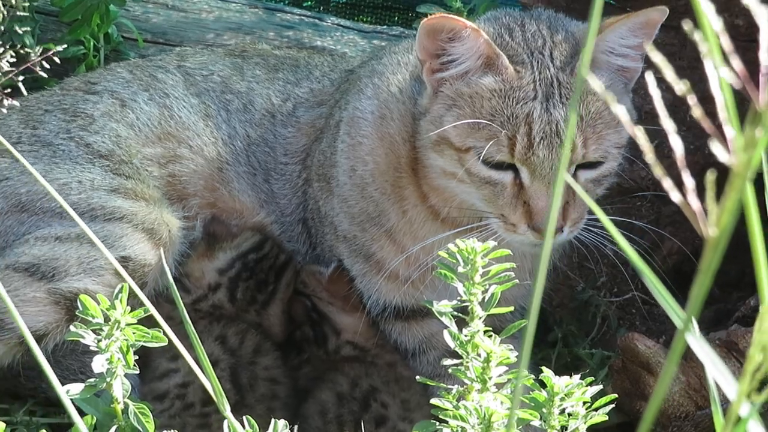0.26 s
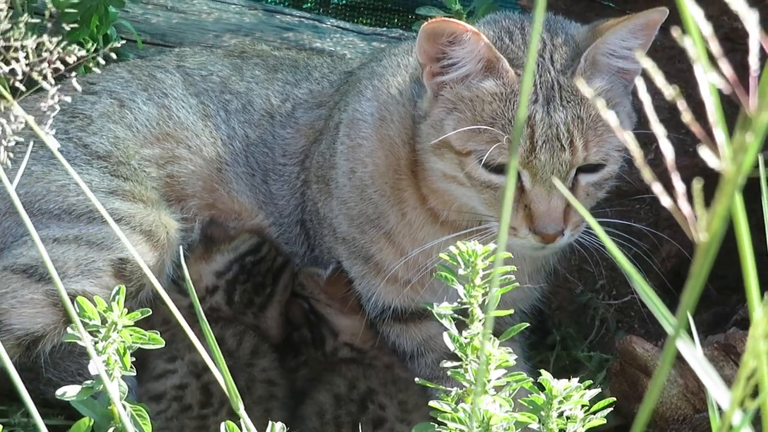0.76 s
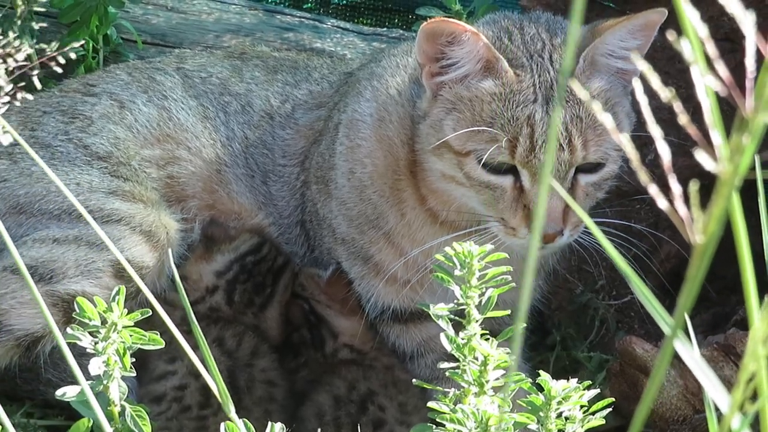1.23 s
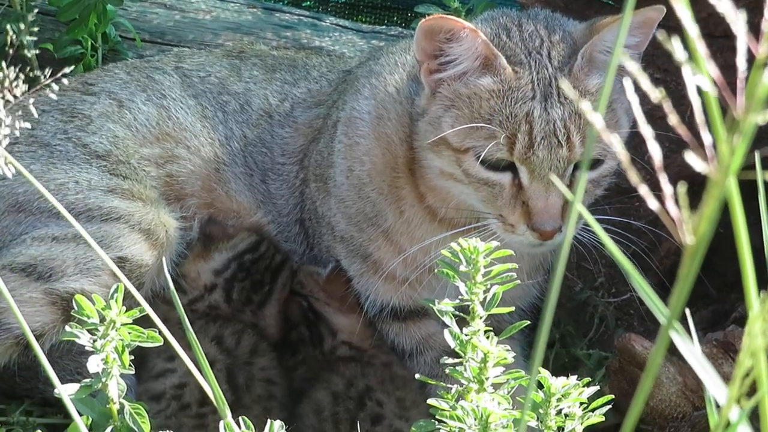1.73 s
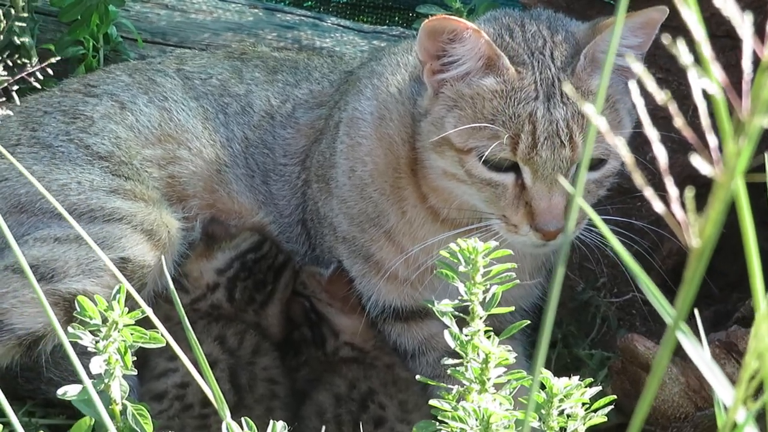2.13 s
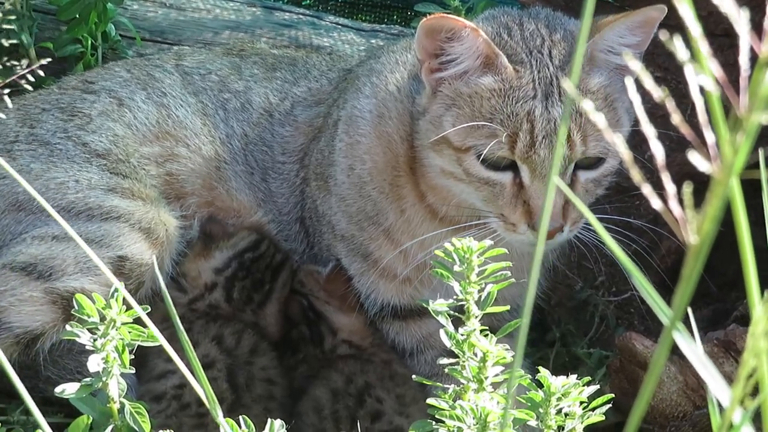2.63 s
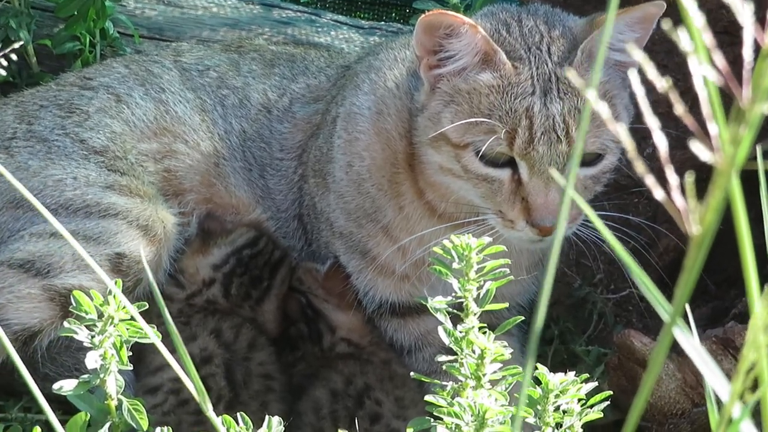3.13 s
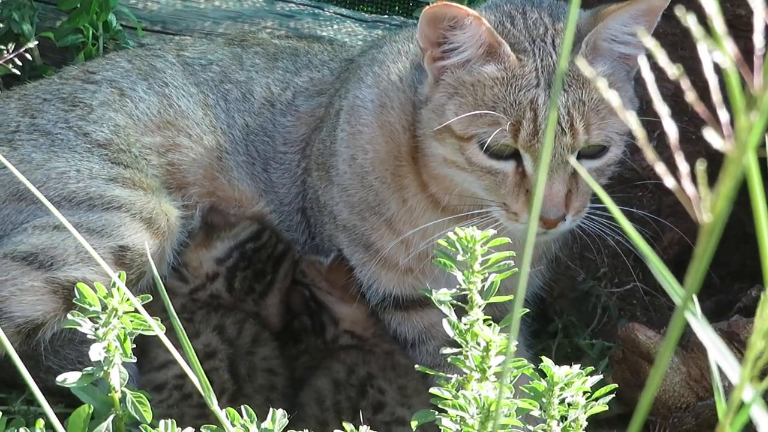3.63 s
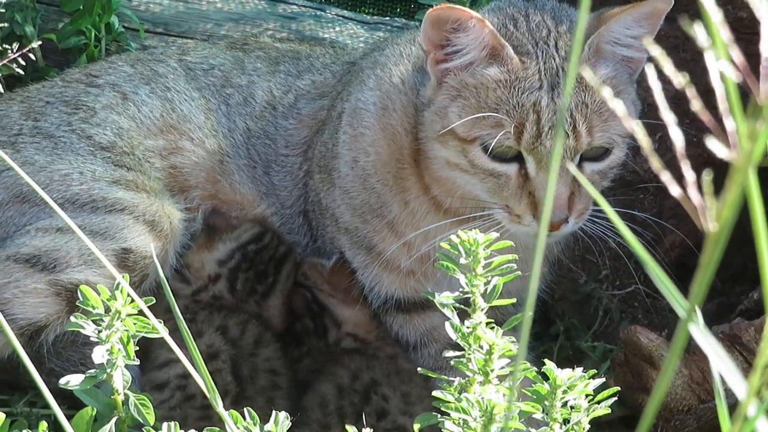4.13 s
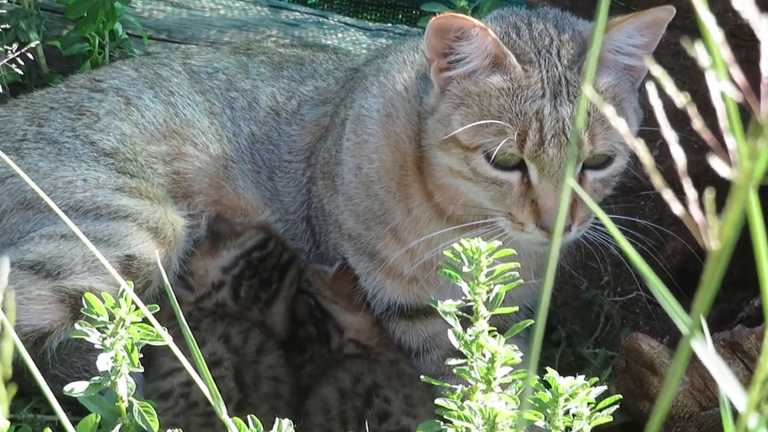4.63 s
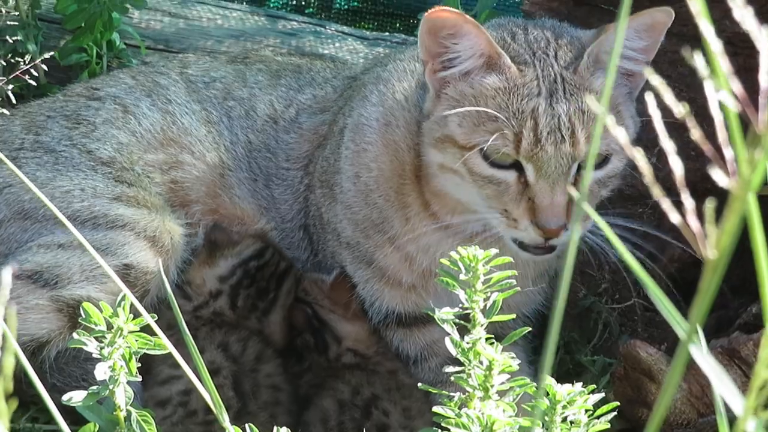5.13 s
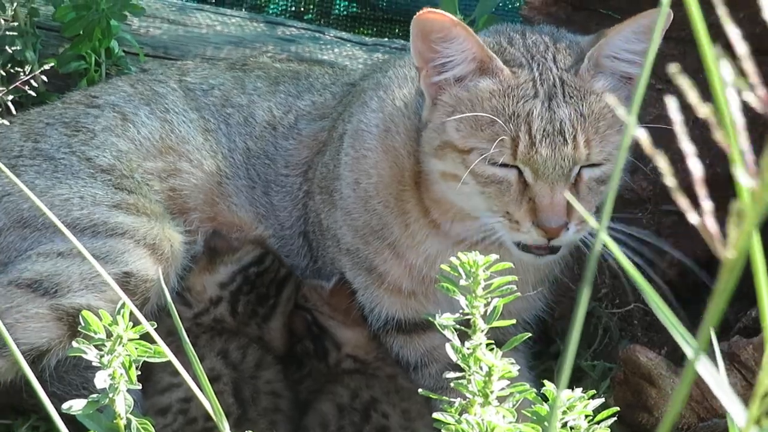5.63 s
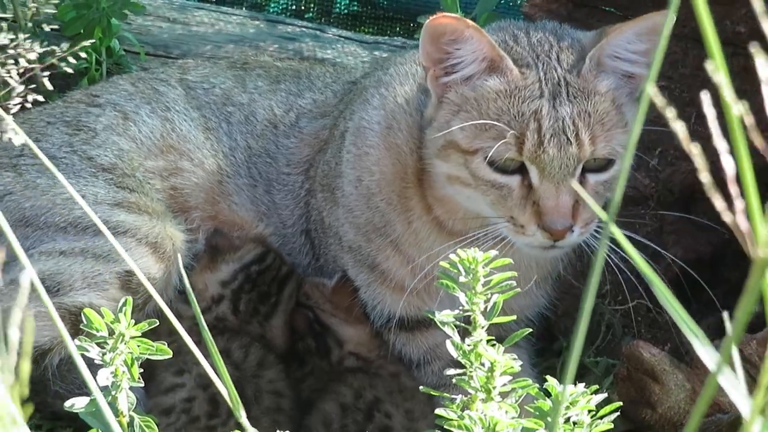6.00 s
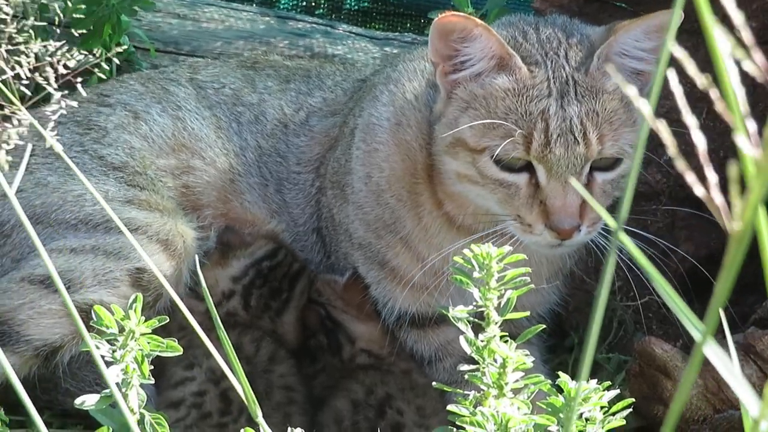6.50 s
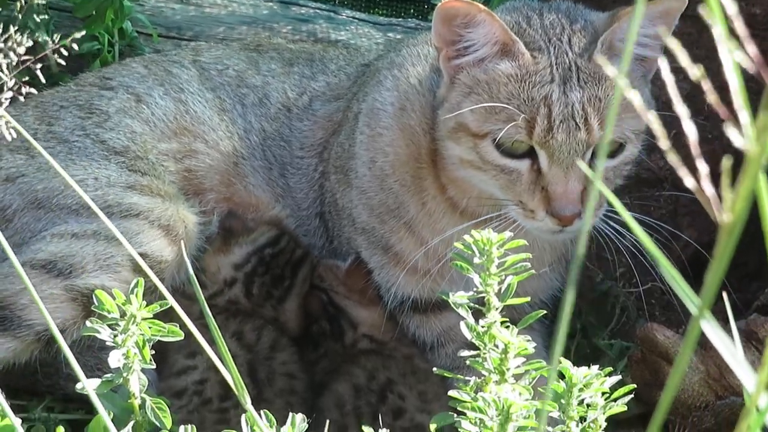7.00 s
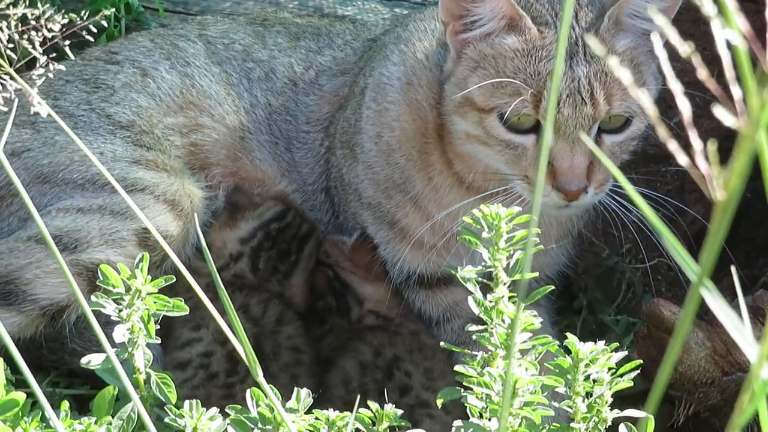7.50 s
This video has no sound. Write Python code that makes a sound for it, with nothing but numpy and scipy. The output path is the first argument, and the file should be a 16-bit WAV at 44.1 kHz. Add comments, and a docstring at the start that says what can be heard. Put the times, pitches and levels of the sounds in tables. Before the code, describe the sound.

A quiet grassy outdoor place with thin hiss, a faint drone and a distant wavering low hum throughout. From 0 to 1.2 s, wind bumps the microphone in soft, low, uneven thuds. A small bird gives faint high peeps about every 0.3 s until 3 s; quick chirrups come near 0.7, 2.1 and 4 s, with sliding whistled phrases at 1.3 and 3.1 s. Light wind puffs recur around 2 and 2.7-3.1 s, then it calms. At 5.2, 5.6 and 5.9-6.2 s a nearby cat makes tiny hoarse, breathy, clipped mews with small lip clicks. Thin stray chirps follow around 6.2-6.4 s, and wind bumps return until 6.9 s. At about 7.3-7.6 s a sudden squall slams both sides of the stereo microphone differently: a loud, rough, low thump with fluttering rattle, much louder than everything else, quickly subsiding to hum and a faint last whistle.

```python
"""Tall grass outdoors, two microphone ports; a machine hum, a drone and a hiss run throughout.
0 s: gusts (shaped noise) and eddies (swept-in harmonic swings) buffet the ports; a bird peeps to 3 s.
0.6-4.1 s: chirrups and whistled phrases, sines on pitch glides, among stray notes that run to the end.
5.2-6.2 s: hoarse cat calls: noise through two mouth resonances, voiced partials, ringing lip clicks.
6.2-7.7 s: more eddies, then a squall that roughens the wind, rattles one port and sets the two apart."""
import sys
import numpy as np
from scipy import signal
from scipy.fft import rfft, irfft, next_fast_len
from scipy.io import wavfile
from scipy.ndimage import uniform_filter1d

SR = 44100
rng = np.random.default_rng(int(sys.argv[2]) if len(sys.argv) > 2 else 0)


def transcribe(signal):
    """Save signal, clipped to [-1, 1], as a 16-bit WAV file at the path in sys.argv[1]."""
    frames = np.atleast_2d(signal).T
    limited = np.clip(frames, -1, 1)
    pcm = np.round(limited * 32767).astype(np.int16)
    wavfile.write(sys.argv[1], SR, pcm)


N = 341951
TIME_S = np.arange(N) / SR

# wind at the ports outside the squall, before flutter: t/s, level/dB
GUST = [(0, -58), (.22, -42.5), (.6, -36.5), (.78, -53.5), (1.1, -34), (1.26, -53.5), (1.7, -55),
        (1.88, -48.5), (2.55, -54), (2.9, -41), (3.1, -48.5), (3.45, -56), (3.81, -43), (4.41, -59.5),
        (5.13, -48), (5.92, -59.5), (6.42, -45), (6.64, -35.5), (6.76, -53.5), (7.12, -44.5), (7.75, -59)]
# single eddies: t/s, level/dB, width at half height/ms
BUFFETS = [(0.185, -27, 12), (0.237, -31, 15), (.268, -30.5, 19), (.349, -35, 23), (.402, -34, 15),
           (.439, -33.5, 19), (.539, -26.5, 13), (.638, -28, 7), (0.669, -22.5, 13), (.707, -30, 36),
           (.783, -30, 15), (1.057, -41, 26), (1.13, -31, 6.5), (1.157, -21.5, 11.5), (1.984, -30.5, 10),
           (2.698, -32, 20), (2.758, -26, 27), (2.793, -27.5, 9.5), (3.086, -27.5, 25), (6.239, -37, 21),
           (6.565, -30, 14), (6.655, -23.5, 24), (6.683, -30.5, 16), (6.736, -32, 14), (6.813, -21, 23),
           (6.849, -31.5, 27), (7.172, -31, 19), (7.318, -25.5, 26), (7.34, -25, 11), (7.363, -21, 6.9),
           (7.385, -14, 3), (7.399, -8, 18.7), (7.414, -13, 11), (7.433, -14.5, 4.9), (7.444, -11.5, 6.4),
           (7.468, -24, 9), (7.483, -16.5, 6.2), (7.496, -17, 4.4), (7.53, -12, 3.1), (7.542, -22.5, 14),
           (7.586, -18, 2.8), (7.603, -28, 8.2), (7.62, -33, 9.1), (7.649, -36, 16)]
# wind spectra, relative: f/Hz, level/dB
FLUTTER = [(10, -7), (30, 1.0), (55, 4.5), (85, -11.5), (130, -12.5), (250, -59.0)]
ROUGH = [(60, -25), (130, 19.5), (250, 0), (430, -17), (560, -62)]
# hoarse cat calls: t/s, length/ms, level/dB, low resonance f/Hz, its width/Hz,
# high resonance start f/Hz, end f/Hz, its level/dB, breath level/dB, attack/ms, change to the end/dB
RASPS = [(5.246, 54, -45.5, 2230, 240, 3800, 3140, -7, -4, 22, -5),
         (5.641, 78, -49, 2170, 300, 3550, 3920, -7, -3, 1.2, -9),
         (5.899, 78, -57.5, 2200, 300, 3700, 3520, -1, -5, 4.6, -7),
         (6.045, 140, -55.5, 1390, 400, 3060, 3110, -1, -2, 8, -3)]
# voiced mews: t/s, length/ms, pitch start, middle, end f/Hz, level/dB (2 dB is added),
# upper partials level/dB, attack/ms, lower partials change to the end/dB, partials under 2 kHz level/dB
MEWS = [(5.266, 56, 546, 555, 475, -51, -1, 8, -15, 2), (5.642, 47, 432, 446, 408, -45.5, -24, 1, -7, -11),
        (5.91, 45, 547, 485, 446, -55.5, -8, 6, -1, -1)]
# mouth response to the mews: f/Hz, level/dB
MOUTH = [(400, -9), (1100, -4), (1600, -14), (1900, -3), (2250, 0), (2800, -3), (3400, -2), (3900, -22)]
# parting lips: t/s, level/dB
SMACKS = [(5.257, -40), (5.702, -41), (5.9504, -39), (5.9613, -32)]
# ringing of a smack: f/Hz, decay time constant/ms, relative level/dB
LIPS = [(1300, 3.7, -8.5), (2250, 1.2, -3), (3000, 0.93, -2), (3700, 1.1, -5.5)]
# steady peep of one bird: end t/s, length/ms, level/dB
PEEPS = [(.035, 35, -63), (.278, 60, -57), (0.581, 48, -58.5), (.881, 36, -55.5), (1.19, 48, -54.5),
         (1.486, 31, -59), (1.795, 42, -63), (2.407, 50, -61), (2.704, 27, -52), (3.006, 30, -60)]
# stray whistled notes, mostly of other birds; the low one at 6.103 s is probably the cat's:
# t/s, length/ms, start, middle, end f/Hz, level/dB, left minus right/dB
NOTES = [(.09, 35, 3150, 3060, 2950, -66, 0), (.99, 55, 2650, 3010, 2850, -64, -1),
         (2.09, 42, 2600, 3000, 2640, -62, -2), (2.145, 40, 4350, 4600, 4850, -70, 0),
         (2.162, 12, 3050, 3200, 3350, -64, 0), (2.224, 12, 2450, 2900, 3500, -60, 0),
         (2.226, 30, 4450, 4250, 3900, -67, 0), (2.243, 14, 4700, 4200, 3700, -60, 0),
         (2.625, 25, 3850, 3920, 3950, -64, 0), (2.705, 62, 3990, 3890, 3740, -65, 2),
         (2.85, 130, 3720, 3700, 3520, -69, 0), (3.052, 32, 2800, 2990, 2950, -61, 0),
         (3.07, 22, 2436, 2690, 2900, -56.5, 0), (3.098, 20, 4200, 4270, 4200, -65, 0),
         (4.695, 100, 2900, 2790, 2580, -67, -1), (4.93, 21, 3450, 3100, 2800, -63, 0),
         (4.972, 58, 2730, 3520, 3980, -65, -2), (5.74, 170, 2940, 2550, 2380, -61, -1.5),
         (5.342, 30, 2900, 2970, 2720, -63, 0), (6.103, 68, 1840, 1800, 1740, -55, 1),
         (6.205, 41, 2680, 2960, 2440, -55, 0), (6.274, 45, 2860, 3800, 4300, -57.5, 0),
         (6.322, 20, 4300, 3400, 2450, -58, 0), (6.344, 14, 2750, 3600, 3980, -59, 0),
         (6.357, 22, 3980, 3670, 3100, -59.5, 0), (6.362, 22, 4300, 3750, 3250, -67, 0),
         (6.983, 156, 2980, 2906, 2610, -61, -1), (7.7, 60, 3050, 2940, 2750, -63.5, -1)]
# a phrase (rise, flick, down-sweep, its echo): t after phrase start/s, length/ms,
# start, middle, end f/Hz, relative level/dB, left minus right/dB
PHRASE = [(.005, 36, 2420, 2880, 3230, -7, -2), (.056, 16, 3050, 3340, 3550, -5, 0),
          (.097, 46, 5100, 4050, 2900, 1.5, -1), (.103, 46, 5040, 4000, 2860, -7, -1)]
# phrases: t/s, level/dB, sweep and echo raised by f/Hz, delayed by/ms
PHRASES = [(1.323, -52.5, 4, -1.5), (3.066, -55.5, -600, 12)]
# one chirrup (falls, whips up, breaks off, falls): t/ms, f/Hz, relative level/dB
CHIRRUP = [(0, 4250, -10), (4, 4080, -0.5), (11.8, 3830, -0.5), (15.8, 3500, -7), (21.6, 3100, 2),
           (24.1, 4400, 9.5), (27, 5900, -16), (28.46, 4420, -30), (29.7, 4050, 3), (35.3, 3650, 6.5),
           (40.2, 3300, -5), (43, 3600, -9), (46.8, 3100, -15)]
# chirrups: t/s, level/dB, first note raised by f/Hz, extra level of the whip/dB
CHIRRUPS = [(.635, -51.5, 2, -5), (.73, -49, 341, -3), (2.054, -54, -4, -11), (2.183, -54.5, 100, -10),
            (3.988, -57, -6, -8), (4.094, -57, 328, -3)]
# far machine, before wavering: t/s, first partial level/dB, second partial level/dB
HUM = [(0, -43, -58.5), (.4, -48.5, -62), (.8, -53, -65), (1.08, -57, -66), (1.2, -46.5, -56.5),
       (1.55, -46.5, -59.5), (1.85, -46, -55), (2.15, -47.5, -57.5), (2.45, -57.5, -62.5), (2.9, -62, -63),
       (3.1, -45, -56.5), (3.65, -49.5, -60), (4.0, -53.5, -67), (4.35, -55, -68), (4.65, -62, -61.5),
       (5.0, -54, -65.5), (5.6, -57, -62), (5.85, -47, -71), (6.2, -46.5, -69), (6.45, -56, -73),
       (6.75, -53, -65), (7.75, -49.5, -65)]
# noisy drone: f/Hz, width of each filter pass/Hz, level/dB
DRONE = [(997.4, 72, -59), (818.5, 120, -64.5)]
# shared hiss spectrum, relative: f/Hz, density/dB
AIR_MID = [(18, -28), (30, -12), (97, -5), (111, -8.5), (126, -11), (182, -15.5), (243, -17), (284, -18.5),
           (531, -19.5), (590, -23.5), (969, -22.5), (1100, -23.5), (6200, -36.5), (15500, -51.5)]
# unshared hiss spectrum, relative: f/Hz, density/dB
AIR_SIDE = [(18, -37), (30, -34), (114, -28), (152, -5), (332, -1), (491, -3), (575, -8), (829, -8.5),
            (920, -10.5), (1720, -12.5), (5880, -23.5), (15500, -40)]

SQUALL_S, SQUALL_RISE_S, SQUALL_HOLD_S, SQUALL_FALL_S, SQUALL_DB = 7.25, .098, .22, .16, -30
SQUALL_PAN_DB, RATTLE_DB = -1.5, -29  # pan: left minus right, on top of the standing port balance
ROUGH_DB, SQUALL_ROUGH_DB = -23, -5.5  # roughness re flutter, in a breeze and in the squall
OUT_OF_STEP_S, OUT_OF_STEP_RISE_S, OUT_OF_STEP_HOLD_S, OUT_OF_STEP_FALL_S = 7.29, .1, .11, .03
OUT_OF_STEP_DB = -26
SWING_HZ, SWING_SLOPE = 77.3, .18  # pitch of a 10 ms eddy outside the squall; narrower swings faster
SQUALL_QUICKENS, SQUALL_SLOPE = .19, .28  # squall: fractional rise in pitch, amount added to the slope
PORT_TURN_HZ = 197  # turn of the right port's all-pass lag
PORT_RING_HZ, PORT_RING_WIDTH_HZ, PORT_RING_DB = 118, 120, 2.2
BREATH_HZ = (1800, 4050)  # band edges
PEEP_HZ, PEEP_PAN_DB = (4015, 4050, 3915), 1  # start, middle, end; left minus right
PEEP_SWELL_DB = 8  # a peep starts this much softer
HUM_HZ, HUM_THIRD_DB = 94.8, -8  # third partial re second
AIR_MID_DB, AIR_SIDE_DB = -49, -53.5
TOP_HZ = 15450


def undb(db):
    """Decibels to amplitude ratio."""
    return 10 ** (np.asarray(db) / 20)


def level(x, db):
    """Scale to an RMS level."""
    return x * undb(db) / np.sqrt(np.mean(x ** 2))


def band(x, hz, width_hz):
    """Resonance with gain 1 at the centre."""
    return signal.lfilter(*signal.iirpeak(hz, hz / width_hz, SR), x)


def band_twice(x, hz, width_hz):
    """Two equal resonances in series: steeper skirts."""
    return band(band(x, hz, width_hz), hz, width_hz)


def noise_band(hz, width_hz):
    """Narrow noise at RMS 1."""
    return level(band_twice(rng.standard_normal(N), hz, width_hz), 0)


def low_pass(x, order, hz):
    """Butterworth low-pass."""
    return signal.sosfilt(signal.butter(order, hz, fs=SR, output="sos"), x)


def coloured(spectrum):
    """Noise shaped by spectrum points, log-frequency interpolated."""
    size = next_fast_len(N)
    hz, db = np.transpose(spectrum)
    bins_hz = np.arange(size // 2 + 1) * SR / size
    gain = undb(np.interp(np.log(bins_hz + 1), np.log(hz), db))
    return irfft(rfft(rng.standard_normal(size)) * gain, size)[:N]


def walk(rate_hz):
    """Random levels held 1 / rate_hz and slewed twice; spread near 1."""
    k = int(SR / rate_hz)
    held = np.repeat(rng.standard_normal(N // k + 1), k)
    return 1.274 * uniform_filter1d(uniform_filter1d(held, k), k)[:N]


def swell(start_s, rise_s, hold_s, fall_s):
    """0 to 1 and back: attack, hold, release."""
    return np.interp(TIME_S, start_s + np.cumsum([0, rise_s, hold_s, fall_s]), [0, 1, 1, 0])


def curves(table):
    """Interpolate each column over time."""
    t_s, *columns = np.transpose(table)
    return [np.interp(TIME_S, t_s, c) for c in columns]


def progress(ms):
    """Ramp 0 to 1 over a length."""
    return np.linspace(0, 1, int(ms * SR / 1000))


def bend(u, start_hz, middle_hz, end_hz):
    """Parabolic pitch glide through three points."""
    return np.polyval(np.polyfit([0, .5, 1], [start_hz, middle_hz, end_hz], 2), u)


def phase(hz):
    """Integrate frequency to radians."""
    return 2 * np.pi * np.cumsum(hz) / SR


def add(out, t_s, sound):
    """Mix a sound in at a time."""
    i = max(int(t_s * SR), 0)
    out[..., i:i + sound.shape[-1]] += sound[..., :N - i]


def gusts(squall):
    """Turbulence: low flutter, with rougher noise that grows in the squall."""
    breeze_db = curves(GUST)[0]
    gust_db = breeze_db + squall * (SQUALL_DB - breeze_db)
    rough_db = ROUGH_DB + squall * (SQUALL_ROUGH_DB - ROUGH_DB)
    flutter, rough = level(coloured(FLUTTER), 0), level(coloured(ROUGH), 0)
    return undb(gust_db + 3.0 * walk(25)) * (flutter + undb(rough_db + 4.3 * walk(40)) * rough)


def add_eddies(near, squall):
    """Eddies: Gaussian-windowed swings, nearer a sawtooth when strong."""
    t = np.arange(-2000, 2000) / SR
    order = np.arange(1, 7)[:, None]
    for (t_s, db, ms), turn in zip(BUFFETS, rng.standard_normal(len(BUFFETS))):
        wild = squall[int(t_s * SR)]
        slope = SWING_SLOPE + SQUALL_SLOPE * wild
        hz = SWING_HZ * (1 + SQUALL_QUICKENS * wild) * (10 / ms) ** slope
        bump = np.exp(-np.log(2) * (2000 * t / ms) ** 2)
        # stronger eddy: slower suck, sharper snap back
        steep = np.clip((db + 38) / 36, 0, .75)
        cycles = hz * t + .29 * (1 - steep) * turn
        swing = steep ** (order - 1) / order * np.sin(order * 2 * np.pi * cycles)
        # 2 ms early to offset the port filter's delay
        add(near, t_s + t[0] - .002, undb(db) * bump * swing.sum(axis=0))


def ports(near, squall):
    """Right port: all-pass lag, ring and rattle; deepest swings are common to both."""
    near = low_pass(near, 8, 470)
    g = np.tan(np.pi * PORT_TURN_HZ / SR)
    late = signal.lfilter([g - 1, g + 1], [g + 1, g - 1], near)
    deep = low_pass(near - late, 1, 60)
    ring = (undb(PORT_RING_DB) - 1) * band(late, PORT_RING_HZ, PORT_RING_WIDTH_HZ)
    apart = swell(OUT_OF_STEP_S, OUT_OF_STEP_RISE_S, OUT_OF_STEP_HOLD_S, OUT_OF_STEP_FALL_S)
    opposed = undb(OUT_OF_STEP_DB - 61 * (1 - apart)) * noise_band(113, 80)
    rattle = undb(RATTLE_DB - 40 * (1 - squall) + 5.2 * walk(40)) * noise_band(201, 76)
    pan_db = SQUALL_PAN_DB / 2 * squall
    left = undb(1.0 + pan_db) * (near - deep) + undb(1.5) * deep + opposed
    right = undb(-pan_db) * (late + ring) + deep - opposed + rattle
    return np.array([left, right])


def wind():
    """Gusts and eddies strike the two ports."""
    squall = swell(SQUALL_S, SQUALL_RISE_S, SQUALL_HOLD_S, SQUALL_FALL_S)
    near = gusts(squall)
    add_eddies(near, squall)
    return ports(near, squall)


def rasps():
    """Hoarse calls: uneven glottal noise through a fixed and a gliding mouth resonance, plus breath."""
    out = np.zeros(N)
    puffs = undb(2.5 * walk(250)) * rng.standard_normal(N)
    # reversal and shift decorrelate the three uses of the noise
    breath_band = signal.butter(3, BREATH_HZ, "band", fs=SR, output="sos")
    breath = signal.sosfilt(breath_band, puffs[::-1])
    slow = low_pass(np.roll(puffs, 5000), 2, 220)
    for (t_s, ms, db, low_hz, width_hz, high_hz, end_hz,
         high_db, breath_db, attack_ms, fade_db) in RASPS:
        u = progress(ms)
        i = int(t_s * SR)
        lead_in = 999  # samples for the resonance to settle
        lower = band_twice(puffs[i - lead_in:][:len(u) + lead_in], low_hz, width_hz)[lead_in:]
        # low-passed noise on a moving carrier
        upper = slow[i:][:len(u)] * np.sin(phase(high_hz + (end_hz - high_hz) * u))
        call = level(lower, 0) + level(upper, high_db) + level(breath[i:][:len(u)], breath_db)
        edges = np.minimum(1, np.minimum(u * ms / attack_ms, (1 - u) / .22))
        add(out, t_s, level(call, db) * undb(fade_db * u) * edges)
    return out


def mews():
    """Voiced calls: nine partials with pitch jitter, weighted by the mouth."""
    out = np.zeros(N)
    order = np.arange(1, 10)[:, None]
    for t_s, ms, start_hz, middle_hz, end_hz, db, upper_db, attack_ms, fade_db, under_db in MEWS:
        u = progress(ms)
        hz = bend(u, start_hz, middle_hz, end_hz) * (1 + .014 * walk(300)[:len(u)])
        partial_hz = order * hz
        up = np.clip((partial_hz - 2350) / 400, 0, 1)
        under = np.clip((2000 - partial_hz) / 150, 0, 1)
        mouth_db = np.interp(partial_hz, *np.transpose(MOUTH))
        mouth_db = mouth_db + upper_db * up + fade_db * u * (1 - up) + under_db * under
        voice = (undb(mouth_db) * np.sin(order * phase(hz))).sum(axis=0)
        edges = np.minimum(1, np.minimum(u * ms / attack_ms, (1 - u) / .2))
        add(out, t_s, undb(db + 2.0 + 2.6 * walk(320)[:len(u)]) * voice * edges)
    return out


def smacks():
    """Parting lips: a click of damped sines."""
    out = np.zeros(N)
    t = np.arange(400) / SR
    onset = np.minimum(1, t / .0003)
    click = sum(undb(db) * np.exp(-t * 1000 / ms) * onset * np.sin(2 * np.pi * hz * t)
                for hz, ms, db in LIPS)
    for t_s, db in SMACKS:
        add(out, t_s, undb(db) * click)
    return out


def cat():
    """Rasps, mews and lip smacks of one throat and mouth."""
    return rasps() + mews() + smacks()


def whistles():
    """Stray notes, phrases and peeps: near-sines on a parabolic glide."""
    out = np.zeros((2, N))
    notes = [(*note, 0) for note in NOTES]
    for t_s, db, raised_hz, wait_ms in PHRASES:
        for k, (after_s, ms, *hz, note_db, pan_db) in enumerate(PHRASE):
            sweep = k >= 2  # down-sweep and echo
            note_s = t_s + after_s + wait_ms / 1000 * sweep
            notes.append((note_s, ms, *(np.array(hz) + raised_hz * sweep), db + note_db, pan_db, 0))
    for end_s, ms, db in PEEPS:
        notes.append((end_s - ms / 1000, ms, *PEEP_HZ, db, PEEP_PAN_DB, PEEP_SWELL_DB))
    for t_s, ms, start_hz, middle_hz, end_hz, db, pan_db, swell_db in notes:
        u = progress(ms)
        tone = np.sqrt(2) * np.sin(phase(bend(u, start_hz, middle_hz, end_hz)))
        shape = np.sin(np.pi * u ** .93) ** .33
        gain = undb(db - swell_db * np.clip(1 - u / .64, 0, 1))
        add(out, t_s, shape * gain * tone * undb([[pan_db / 2], [-pan_db / 2]]))
    return out


def chirrups():
    """Chirrups: sines along one pitch and level contour."""
    out = np.zeros((2, N))
    ms, hz, shape_db = np.transpose(CHIRRUP)
    t_ms = np.arange(int(ms[-1] * SR / 1000)) * 1000 / SR
    whip = np.exp(-((t_ms - 25) / 4.8) ** 2)
    pan_db = np.array([[-.4], [.4]])
    for t_s, db, raised_hz, whip_db in CHIRRUPS:
        pitch_hz = np.interp(t_ms, ms, hz) + raised_hz * np.clip((16 - t_ms) / 4, 0, 1)
        gain_db = db + np.interp(t_ms, ms, shape_db) + whip_db * whip + pan_db
        add(out, t_s, undb(gain_db) * np.sin(phase(pitch_hz)))
    return out


def whistles_and_chirrups():
    """Birds and stray notes; moving air makes their level flutter."""
    return (whistles() + chirrups()) * undb(1.0 * walk(60) + 1.6 * walk(350))


def leaves(x):
    """Grass and leaves scatter sound: a decaying noise blur, different on each side."""
    t = np.arange(int(.12 * SR)) / SR
    blur = rng.standard_normal((2, len(t))) * np.exp(-t / .018) * (t > .002)
    return x + undb(-29) * signal.fftconvolve(x, blur, axes=1)[:, :N]


def machine():
    """Far machine: three wavering harmonic partials and narrow noisy drones."""
    turn = phase(HUM_HZ + .5 * walk(5.93))
    first_db, second_db = curves(HUM)
    out = np.zeros(N)
    for k, db in enumerate([first_db, second_db, second_db + HUM_THIRD_DB], 1):
        out += np.sqrt(2) * undb(db + 1.3 * walk(4.92)) * np.sin(k * turn)
    for hz, width_hz, db in DRONE:
        out += undb(db) * noise_band(hz, width_hz)
    return out


def air():
    """Distant leaves and microphone hiss: shared and opposed noise, drifting slightly in level."""
    mid = level(coloured(AIR_MID), AIR_MID_DB)
    side = level(coloured(AIR_SIDE), AIR_SIDE_DB)
    return undb(.86 * walk(3.356)) * np.array([mid + side, mid - side])


def scene():
    """Sum of all sources; only the cat, whistles and chirrups pass the leaves."""
    return wind() + leaves(cat() + whistles_and_chirrups()) + machine() + air()


def record(dry):
    """Bass cut, slight gain reduction when loud, rounded peaks, steep top cut."""
    x = signal.sosfilt(signal.butter(1, 20, "high", fs=SR, output="sos"), dry)
    loud = uniform_filter1d(np.abs(x).max(axis=0), int(.25 * SR))
    x = x * np.minimum(1, (.038 / (loud + 1e-9)) ** .12)
    x = .9 * np.tanh(x / .9)
    return signal.sosfilt(signal.ellip(10, .2, 80, TOP_HZ, fs=SR, output="sos"), x)


dry = scene()
out = record(dry)
transcribe(out)
```